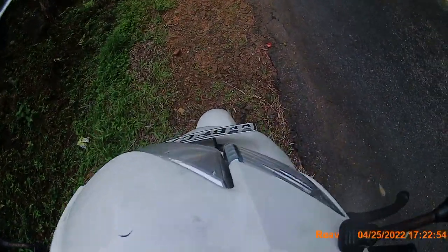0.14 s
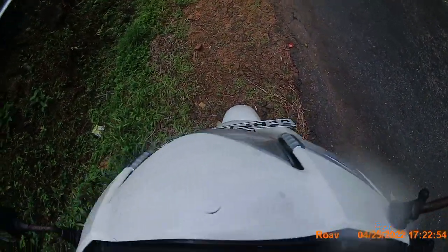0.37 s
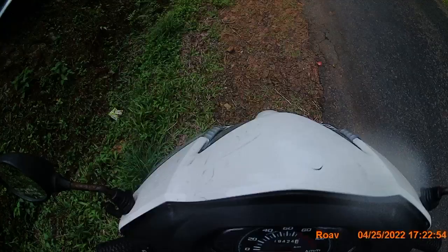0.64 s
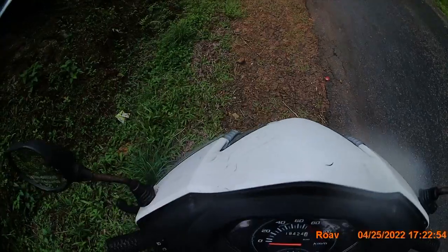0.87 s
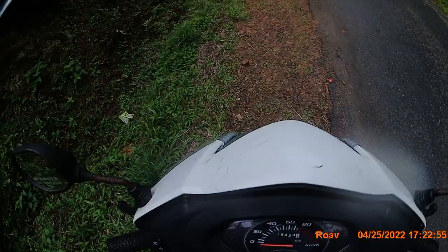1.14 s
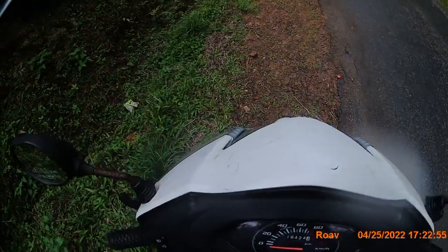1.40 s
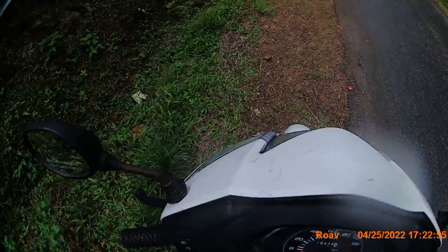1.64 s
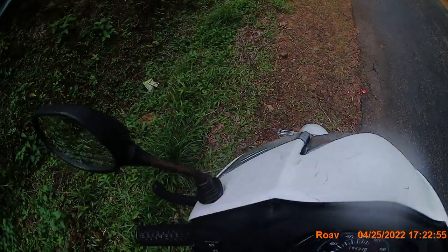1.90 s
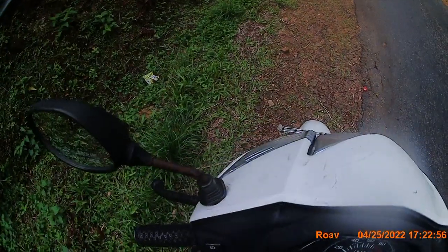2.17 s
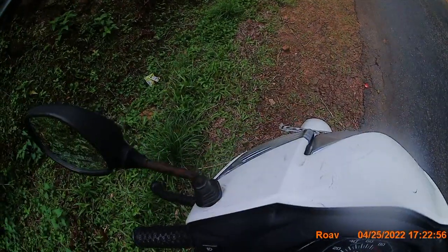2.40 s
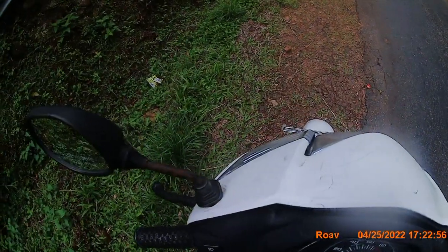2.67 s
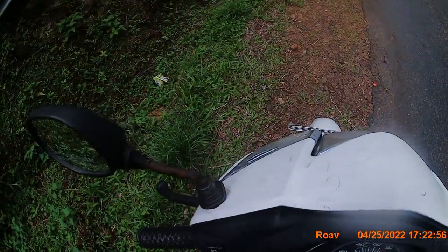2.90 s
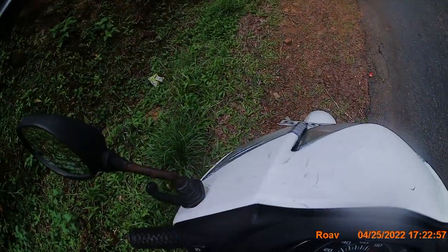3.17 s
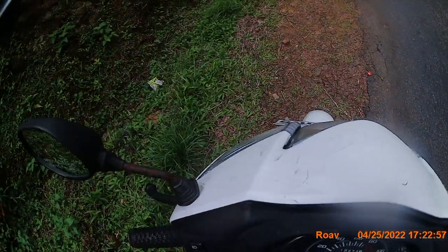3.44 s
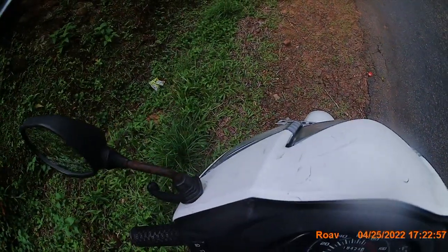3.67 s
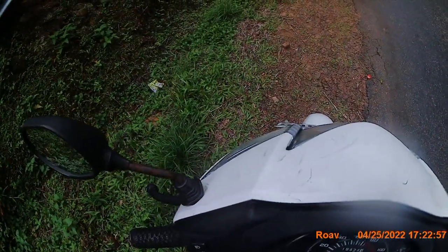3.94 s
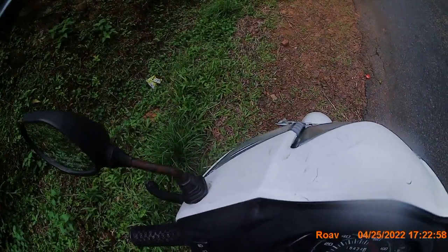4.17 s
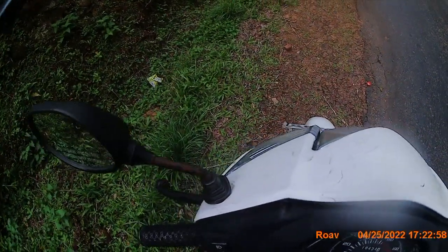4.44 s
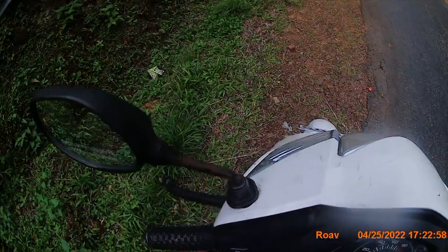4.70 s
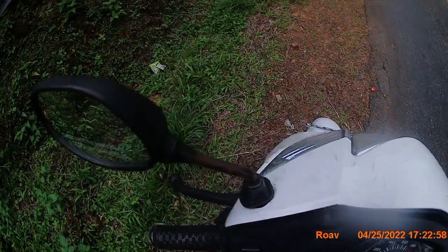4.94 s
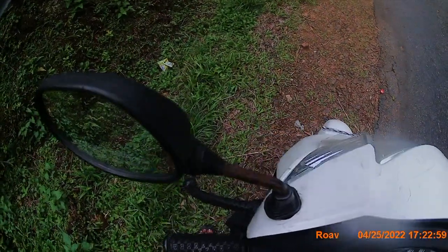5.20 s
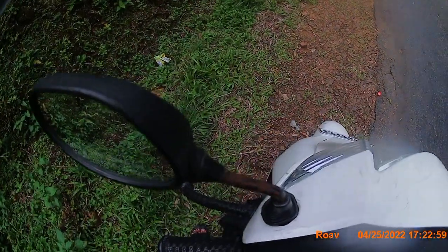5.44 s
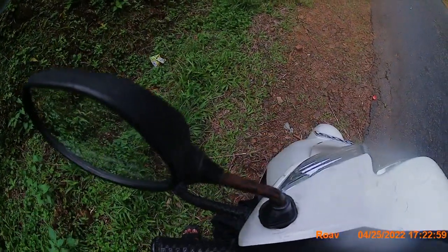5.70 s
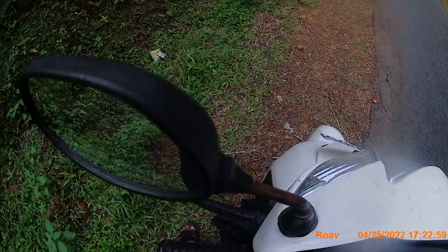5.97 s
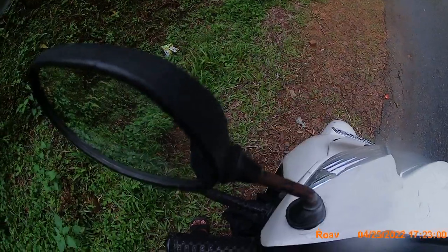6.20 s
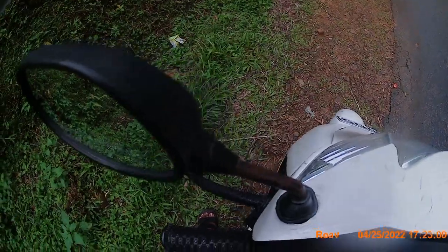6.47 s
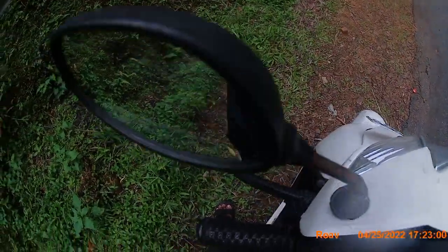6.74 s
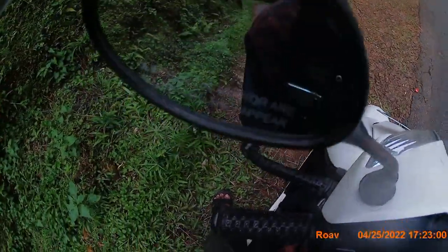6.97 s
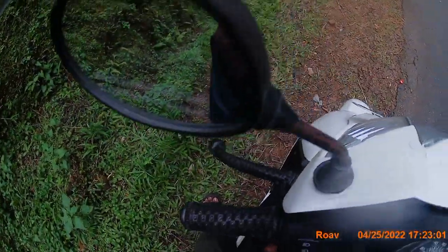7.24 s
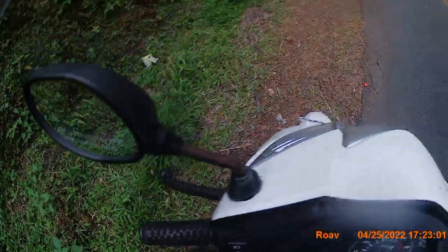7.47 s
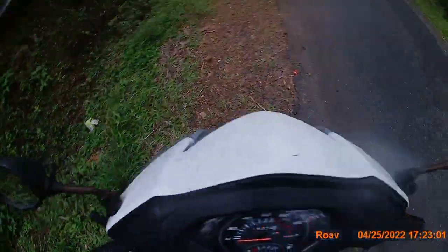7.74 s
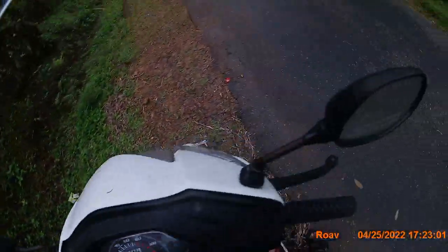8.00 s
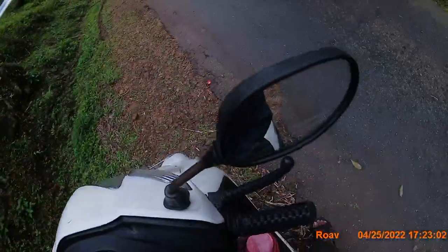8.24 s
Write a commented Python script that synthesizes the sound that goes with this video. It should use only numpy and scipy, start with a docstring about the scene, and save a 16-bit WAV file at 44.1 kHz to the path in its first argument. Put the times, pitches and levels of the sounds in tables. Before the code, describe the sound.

A small one-cylinder scooter idles in steady low putts with a few stumbling misfires, while clothing rustles and small ticks sound close to the microphone.

```python
"""Roadside: a small one-cylinder four-stroke scooter idles, heard by a microphone worn by the rider.
Each engine cycle sends five pressure steps down the exhaust, ringing pipe and silencer; some charges fail to burn.
Dense random contacts ring the casing; grains of noise make the rider's clothing rustle and rub.
Short resonant noise bursts tick; early on a far insect chirrs as pulses in one narrow resonance."""
import sys
import numpy as np
from scipy import signal
from scipy.fft import rfft, irfft, next_fast_len
from scipy.io import wavfile

SR = 44100
rng = np.random.default_rng(int(sys.argv[2]) if len(sys.argv) > 2 else 0)


def waveform_to_disk(signal):
    """Save audio, clipped to [-1, 1], as 16-bit WAV at the path in sys.argv[1]."""
    frames = np.transpose(np.atleast_2d(signal))
    scaled = np.clip(frames, -1, 1) * 32767
    samples = np.round(scaled).astype(np.int16)
    wavfile.write(sys.argv[1], SR, samples)


def ratio(d):
    """dB to gain"""
    e = np.asarray(d, float) / 20
    return 10 ** e


N = 369116

USUAL_CYCLE_S = .078
USUAL_BURN = 1.13   # mean strength of a sound charge before carry-over


def rms_one(x):
    """Scale to rms 1."""
    return x / np.sqrt(np.mean(x ** 2) + 1e-20)


def in_time(rows):
    """Each column of a curve table as one value per sample."""
    s, *columns = np.transpose(rows)
    return [np.interp(np.arange(N) / SR, s, column) for column in columns]


def ring(clicks, hz, t60_s):
    """Two-pole resonator: a unit click starts a decaying sine of height 1."""
    r, w = ratio(-60 / (t60_s * SR)), 2 * np.pi * hz / SR
    return signal.lfilter([0, np.sin(w)], [1, -2 * r * np.cos(w), r * r], clicks + 1e-18)


def resonate(x, hz, width_hz):
    """A resonance of gain 1 applied twice, so that the valleys stay dark."""
    r = np.exp(-1.55 * np.pi * width_hz / SR)   # each pass wider, so the pair has width_hz
    numerator = [(1 - r * r) / 2, 0, (r * r - 1) / 2]
    denominator = [1, -2 * r * np.cos(2 * np.pi * hz / SR), r * r]
    section = numerator + denominator
    return signal.sosfilt([section, section], x)


def coloured(x, spectrum):
    """Shape to a spectrum, interpolated over log frequency; rms 1."""
    size = next_fast_len(N)
    hz, level_db = np.transpose(spectrum)
    log_hz = np.log(np.arange(size // 2 + 1) * SR / size + 1)
    gain = ratio(np.interp(log_hz, np.log(hz), level_db))
    return rms_one(irfft(rfft(x, size) * gain, size)[:N])


def grains(per_s, spread_db):
    """Random clicks of uneven size and sign."""
    size_db = spread_db * np.minimum(rng.exponential(1, N), 5)
    sizes = ratio(size_db) * rng.choice([-1, 1], N)
    return sizes * (rng.random(N) < per_s / SR)


def drift(rate_hz):
    """Slow random curve of rms 1: noise through a double pole at rate_hz."""
    step = 40   # samples between drawn points
    r = np.exp(-2 * step * np.pi * rate_hz / SR)
    noise = rng.standard_normal(N // step + 2002)
    slow = signal.lfilter([1], [1, -2 * r, r * r], noise)[2000:]   # start-up dropped
    return np.interp(np.arange(N) / step, np.arange(len(slow)), rms_one(slow))


def swells(rows):
    """Each row rises to its peak and falls again as raised cosines; powers add."""
    rise = 0.52   # share of the length before the peak
    t, power = np.arange(N) / SR, np.zeros(N)
    for s, db, length_s in rows:
        part = slice(*np.searchsorted(t, [s - length_s, s + length_s]))
        before, after = (s - t[part]) / rise, (t[part] - s) / (1 - rise)
        far = np.maximum(before, after) / length_s
        height = ratio(db) * np.cos(np.pi / 2 * np.minimum(far, 1)) ** 2
        power[part] += height ** 2
    return np.sqrt(power)


def insect():
    """Regular pulses with some noise drive one narrow resonance."""
    # chirrs: peak t/s, level/dB, length/s
    chirr_rows = [(.12, -75, .45), (.78, -69, .38), (1.0, -70, .22)]
    pulses_per_s, roughness = 63.6, .3   # roughness: noise rms relative to pulses
    pulses = np.diff(np.floor(np.arange(N + 1) * pulses_per_s / SR))
    wing = rms_one(pulses) + roughness * rng.standard_normal(N)
    return swells(chirr_rows) * rms_one(resonate(wing, hz=5630, width_hz=150))


def clothing():
    """Fine fibre grains in clumps, and a duller rub of cloth near the microphone."""
    # rustle spectrum: f/Hz, relative level per Hz/dB
    rustle_spectrum = [(900, -25), (1200, -5), (1800, 2), (2300, -2), (2650, -10), (3200, 0), (3900, -2.5),
                       (4400, -8.5), (5500, -12), (7500, -13.5), (9000, -17.5)]
    # rub spectrum: f/Hz, relative level per Hz/dB
    rub_spectrum = [(150, -36), (300, 3), (360, -3), (430, 6), (540, -4), (750, -5.5), (1000, -20.5),
                    (1400, -16), (2000, -37)]
    # rustles: peak t/s, level/dB, length/s
    rustle_rows = [(0.0, -53.5, 0.067), (.37, -55, 0.18), (1.24, -51.5, .1), (1.35, -53.5, 0.3),
                   (1.65, -65, 0.25), (2.07, -56.5, 0.12), (2.91, -59, 0.17), (3.97, -55.5, 0.15),
                   (4.08, -55.5, 0.049), (5.13, -52.5, 0.28), (5.29, -58, .06), (5.51, -55, .2),
                   (5.78, -58, 0.25), (5.91, -54.5, 0.056), (6.05, -52, .1), (6.27, -50.5, 0.32),
                   (6.45, -54, 0.4), (6.72, -61.5, .2), (7.0, -60.5, 0.41), (7.46, -49.5, 0.33),
                   (7.62, -58.5, .08), (8.11, -53, 0.088), (8.21, -50, 0.18)]
    # duller rubs close by: peak t/s, level/dB, length/s
    rub_rows = [(5.98, -45.5, .25), (6.31, -44.5, 0.22), (7.46, -38, 0.38), (8.0, -48.5, .3),
                (8.2, -46.5, 0.24)]
    floor_db = -63.5   # steady rustle under the swells
    rustle = coloured(grains(4000, 2.1) * ratio(1.8 * drift(44)), rustle_spectrum)
    rub = coloured(grains(1500, 1.4) * ratio(0.83 * drift(27)), rub_spectrum)
    rustle_level = np.hypot(ratio(floor_db), swells(rustle_rows))
    return rustle_level * rustle + swells(rub_rows) * rub


def ticks():
    """Each tick is a burst of noise that dies fast, heard through a resonance at its own pitch."""
    # ticks and short squeaks: t/s, peak level/dB, f/Hz, burst t60/s
    tick_rows = [(.156, -36, 1550, .04), (1.294, -46, 3700, .025), (1.362, -40, 1650, .06),
                 (1.374, -37, 1800, .11), (1.46, -48, 3600, .015), (1.66, -50, 3800, .02),
                 (3.988, -46, 3500, .025), (5.911, -43, 3400, .025), (6.009, -38, 800, .03),
                 (6.147, -47, 3600, .015), (6.722, -27, 650, .035), (7.61, -47, 3400, .02),
                 (7.699, -47, 3500, .015), (7.998, -44, 3400, .02), (8.105, -48, 5200, .04)]
    size = 4000
    out, age_s = np.zeros(N), np.arange(size) / SR
    for s, peak_db, hz, t60_s in tick_rows:
        burst = rng.standard_normal(size) * ratio(-60 * age_s / t60_s)
        tick = resonate(burst, hz, width_hz=.2 * hz)
        at = round(s * SR)
        out[at:at + size] += ratio(peak_db) * tick / np.abs(tick).max()
    return out


def cycles():
    """Start/s of every engine cycle, and shortfall of each charge; a weak charge lengthens its cycle."""
    # hunting idle: t/s, cycle length without shortfall/ms
    idle_curve = [(0.0, 78.78), (0.65, 80.31), (0.85, 77.92), (1.25, 79.87), (1.7, 74.48), (2.05, 74.92),
                  (2.55, 80.24), (3.4, 75.62), (3.6, 76.99), (4.4, 74.45), (4.75, 78.83), (5.1, 76.51),
                  (5.65, 79.75), (6.25, 77.77), (6.5, 79.56), (7.15, 76.54), (7.3, 77.08), (8.4, 72.66)]
    # weak charges: t/s, burn strength (below 0: misfire that sucks gas back)
    weak_rows = [(-.03, .76), (.61, .89), (.77, .78), (.93, .82), (1.4, .2), (2.16, .76), (3.33, .89),
                 (3.56, -.34), (3.72, -.47), (3.87, -.1), (4.4, .54), (5.18, .81), (5.41, .83), (5.65, .74),
                 (5.97, .81), (6.36, .16), (6.68, .65), (7.14, .87), (7.45, .45), (7.98, .48), (8.13, .77),
                 (8.28, -.13)]
    first_s, drag_ms = -.02625, 1.974   # drag_ms: delay per root of shortfall
    weak_s, weak = np.transpose(weak_rows)
    s, cycle_ms = np.transpose(idle_curve)
    start, short = [first_s], []
    while start[-1] < N / SR:
        near = abs(weak_s - start[-1]) < USUAL_CYCLE_S / 2
        short.append(np.sum((USUAL_BURN - weak)[near]))
        length_ms = np.interp(start[-1], s, cycle_ms) + drag_ms * np.sqrt(short[-1])
        start.append(start[-1] + length_ms / 1000)
    return np.array(start[:-1]), np.array(short)


def stroke(per_cycle, lag_cycles):
    """A wave of height 1 that follows the engine cycle."""
    start = cycles()[0]
    cycle = np.interp(np.arange(N) / SR, start, np.arange(len(start)))
    return np.cos(2 * np.pi * per_cycle * (cycle - lag_cycles))


def casing(modes, level_db, beats_db, patchy_db):
    """Dense mechanical contacts ring each resonance, harder during part of the cycle."""
    out = 0
    contacts = [grains(6000, 3.44), grains(6000, 3.23)]   # neighbouring modes get unrelated contacts
    for k, (hz, width_hz, mode_db) in enumerate(modes):
        beat_db = beats_db[k % len(beats_db)]
        gain = ratio(mode_db + beat_db + patchy_db * drift(7.9))
        out = out + gain * resonate(contacts[k % 2], hz, width_hz)
    return ratio(level_db) * rms_one(out)


def clatter(mid_db, high_db):
    """Casing and panels in three bands: low modes beat once a cycle, the others once per crank turn."""
    # low resonances: f/Hz, width/Hz, relative level/dB
    low_modes = [(36, 32, -2.5), (73, 10, -3.5), (108, 42, -2), (189, 98, -9), (303.8, 39.3, 1.5),
                 (370, 55, -3), (428.8, 46.6, 3), (496.7, 43, -1.5), (547.5, 49, -8)]
    # middle resonances: f/Hz, width/Hz, relative level/dB
    mid_modes = [(622.5, 75, 0.5), (718.3, 77, 2.5), (800, 62.5, 1.5), (1089, 34, -5.5), (1228, 95, -8.5),
                 (1395, 72, -8.5), (1329, 330, -12.5), (1753, 294, -14), (2204, 246, -15)]
    # high resonances: f/Hz, width/Hz, relative level/dB
    high_modes = [(3050, 324, 0), (3675, 570, -3.5), (4490, 800, -5.5), (5710, 610, -8.5),
                  (6930, 1800, -11.5)]
    # beat of each low resonance: depth/dB, loudest point/share of the cycle
    beat_rows = [(1, .2), (2, .9), (4, .42), (4.5, .15), (2.5, .5), (1, .3), (4, .72), (5.5, .33), (1, .4)]
    low_beats_db = [depth_db * stroke(1, share) for depth_db, share in beat_rows]
    knocks = stroke(2, .44)   # two crank turns per cycle
    low = casing(low_modes, -41.5, low_beats_db, patchy_db=-0.03)
    mid = casing(mid_modes, mid_db, [0.86 * knocks], patchy_db=0.63)
    high = casing(high_modes, high_db, [.5 * knocks], patchy_db=0.7)
    return low + mid + high


def burns(short):
    """Charges vary by chance; each sound one gains from what the one before left unburnt."""
    spread, carry, carry_most = .09, .18, .5   # carry: share of leftover gained; carry_most: leftover limit
    burn, left = USUAL_BURN + spread * rng.standard_normal(len(short)), 0
    for k, missing in enumerate(short):
        burn[k] = USUAL_BURN - missing if missing else burn[k] + carry * left
        left = min(USUAL_BURN - burn[k], carry_most)
    return burn


def exhaust(ring_db):
    """Valve steps ring pipe and silencer, burnt gas rings chambers; burn strength sets part of each step."""
    # steps per cycle: delay at usual cycle/s, push, push per burn, sharp push, sharp push per burn
    valve_steps = [(0.0017, 0.1413, 0.8585, 0.1246, -0.1189), (0.01234, -0.1547, 0.6174, 0.4221, 0.3217),
                   (0.01892, 0.7296, 0.4695, -0.0127, 1.014), (0.03133, -0.84, 0.01969, 0.252, 0.06762),
                   (0.0644, 0.1728, -0.003292, -0.2898, 0.1482)]
    # low pipe modes: f/Hz, signed relative height, t60/s
    pipe_modes = [(76.89, 0.04907, 0.16), (137.0, -0.4968, 0.02072), (150.5, 0.4088, 0.0232)]
    # silencer modes rung by the sharp pushes: f/Hz, signed relative height, t60/s
    silencer_modes = [(457.8, 0.01276, 0.11), (485.2, -0.01097, 0.08)]
    # chambers rung once as burnt gas arrives: delay at usual cycle/s, f/Hz, signed relative height, t60/s
    chamber_modes = [(0.006751, 197.3, 0.01611, 0.08405), (0.01138, 331.7, -0.007891, 0.12)]
    # late burns after a misfire: t/s, push
    late_burns = [(1.414, -0.57), (3.573, -0.98), (3.724, -1.04), (3.898, -0.51), (6.369, -0.57)]
    level_db, bark_db, push_spread = .6, 1.7, .05
    stretch = .446   # delays grow a little when the crank turns slower
    start, short = cycles()
    burn = burns(short)
    slower = (np.gradient(start) / USUAL_CYCLE_S) ** stretch
    lead = SR // 10   # room for the cycle already under way

    def train(delay_s, size):
        """One uneven click per cycle."""
        clicks = np.zeros(N + 3 * lead)
        at = np.round((start + delay_s * slower) * SR).astype(int) + lead
        clicks[at] = size * (1 + push_spread * rng.standard_normal(len(at)))
        return clicks

    soft = sum(train(delay_s, push + per_burn * burn) for delay_s, push, per_burn, _, _ in valve_steps)
    sharp = sum(train(delay_s, snap + per_burn * burn) for delay_s, _, _, snap, per_burn in valve_steps)
    for s, push in late_burns:
        soft[round(s * SR) + lead] = push
    sharp[lead:lead + N] *= ratio(ring_db)
    pipe = sum(height * ring(soft, hz, t60_s) for hz, height, t60_s in pipe_modes)
    silencer = sum(height * ring(sharp, hz, t60_s) for hz, height, t60_s in silencer_modes)
    chambers = sum(height * ring(train(delay_s, burn), hz, t60_s)
                   for delay_s, hz, height, t60_s in chamber_modes)
    gas = pipe + ratio(bark_db) * silencer + chambers
    # valves take time to move
    gas = signal.sosfilt(signal.butter(2, 900, fs=SR, output="sos"), gas)
    # a small outlet radiates little deep bass
    gas = signal.sosfilt(signal.butter(2, 42, "high", fs=SR, output="sos"), gas)
    return ratio(level_db) * gas[lead:lead + N]


def scene():
    """Insect, rider and engine, mono."""
    # levels as the head turns: t/s, silencer ring gain/dB, casing mid level/dB, casing high level/dB
    head_turns = [(0.0, -4.5, -44, -59), (0.6, -4, -47, -64), (1.3, -0.5, -46, -62.5),
                  (1.9, -0.5, -47, -63), (3.7, -1, -47, -63), (4.3, 2, -47, -62.5),
                  (4.9, -2.5, -46.5, -63.5), (6.3, -3.5, -43.5, -60.5), (7.0, -0.5, -44, -60),
                  (7.7, -0.5, -45.5, -61.5), (8.1, -7.5, -44, -56.5), (8.4, -3, -44.5, -58)]
    ring_db, mid_db, high_db = in_time(head_turns)
    rider = clothing() + ticks()
    engine = clatter(mid_db, high_db) + exhaust(ring_db)
    return (insect() + rider + engine)[None]


def roll_off(x):
    """The treble ends steeply here."""
    return signal.sosfilt(signal.butter(12, 8800, fs=SR, output="sos"), x)


def record(dry):
    """A narrow-band microphone path: a steep low-pass cuts the treble."""
    cutoff_hz = 7470
    mix = signal.sosfilt(signal.butter(10, cutoff_hz, fs=SR, output="sos"), dry)
    return roll_off(mix)


dry = scene()
out = record(dry)
waveform_to_disk(out)
```